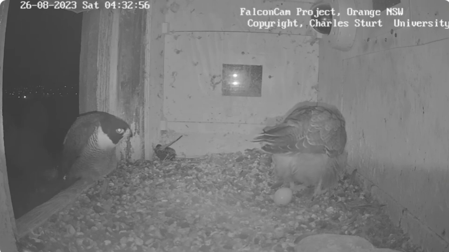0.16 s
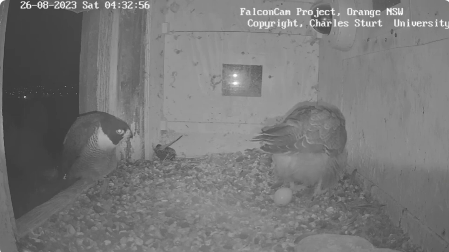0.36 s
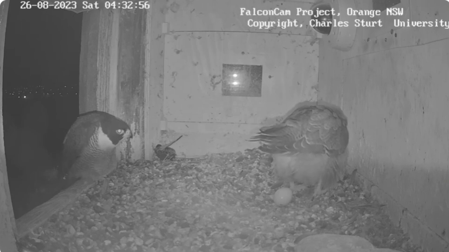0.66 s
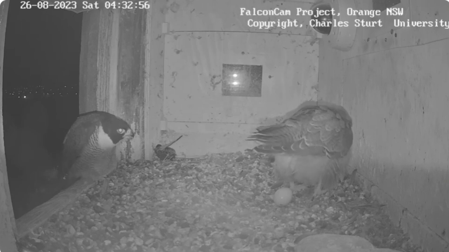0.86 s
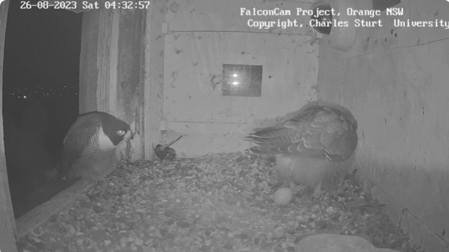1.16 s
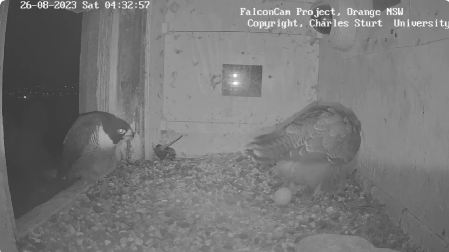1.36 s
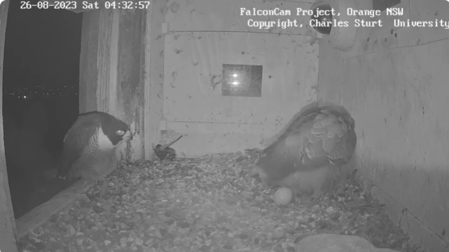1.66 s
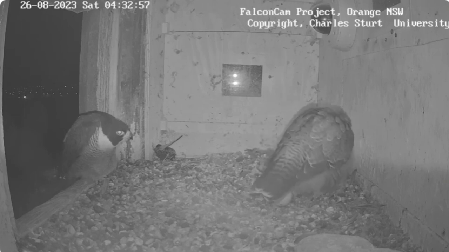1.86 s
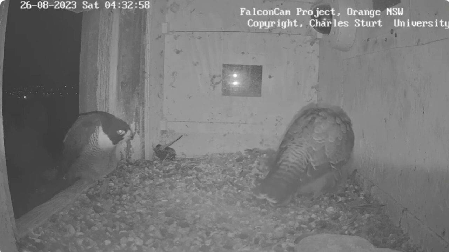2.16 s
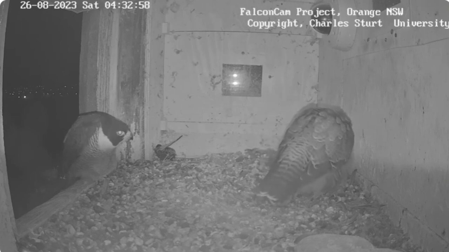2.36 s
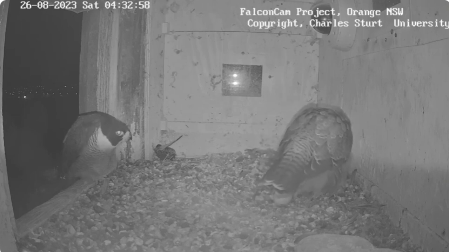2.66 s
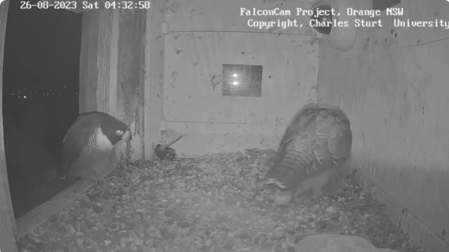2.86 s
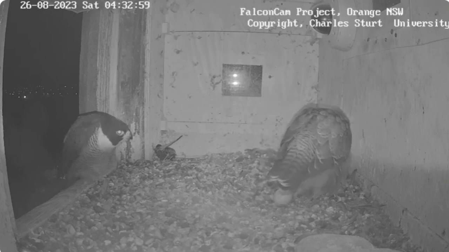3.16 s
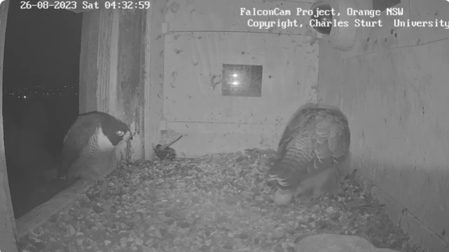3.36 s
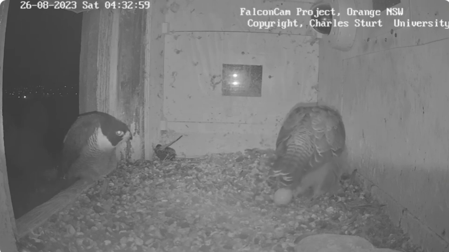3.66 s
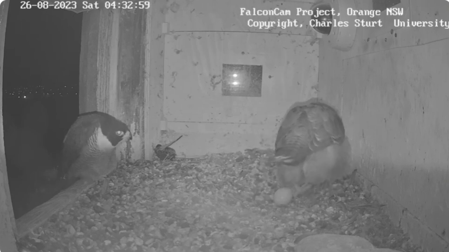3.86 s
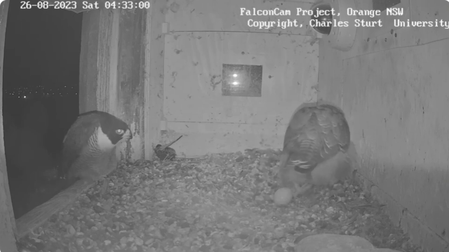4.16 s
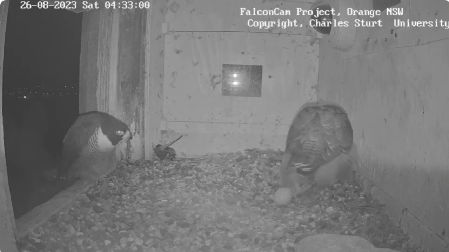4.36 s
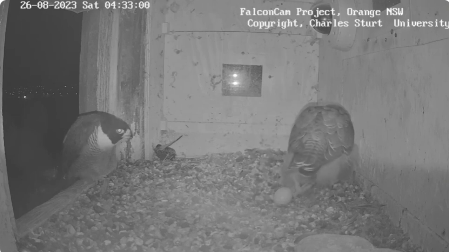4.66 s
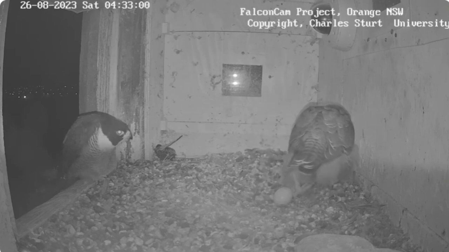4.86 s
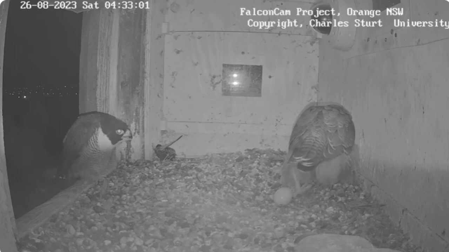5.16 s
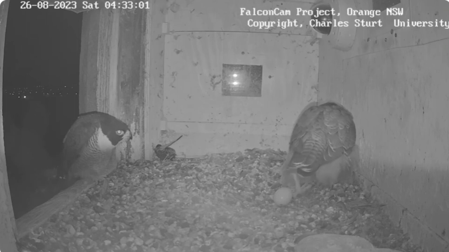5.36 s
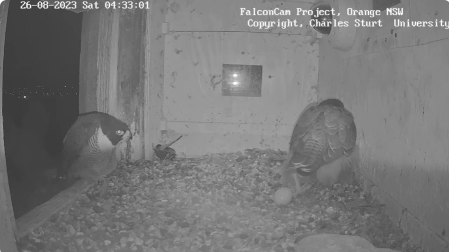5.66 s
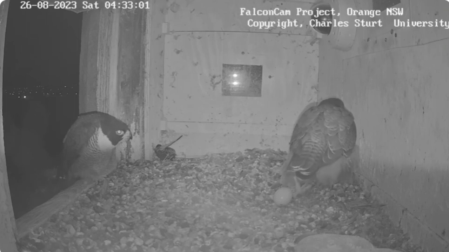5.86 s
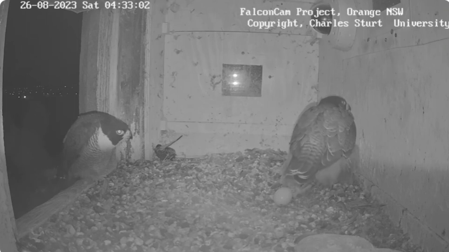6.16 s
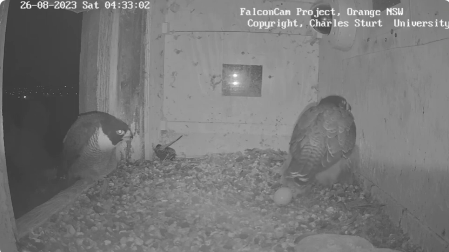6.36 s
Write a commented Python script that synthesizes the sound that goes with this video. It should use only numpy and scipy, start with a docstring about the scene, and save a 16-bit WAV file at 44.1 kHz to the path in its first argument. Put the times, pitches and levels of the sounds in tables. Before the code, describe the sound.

A falcon repeats a sharp, squeaky chirp with a croaky end, about seven times at uneven intervals, in a reverberant nest box. A soft, low hoot-like tone trails the opening call, and another falcon cuts in with one louder cry near the middle. Faint, dull steps on gravel lie beneath. The nest camera's microphone adds a constant electrical hum and hiss, with a very faint high tone late on.

```python
"""Sharp "ee-chup" calls of two falcons ring on in a long reverberant tail, over hum, hiss and rumble.
Each is a rising whistle that breaks down about an octave into a yelp and ends in a pulsed croak.
Midway one louder call answers, both sides of the syrinx sounding at once.
A grunt and a low hoot-like tone follow the first call; one bird shuffles on gravel.
A faint high tone enters late. The camera's sound cuts out twice for an instant."""
import sys
import numpy as np
from scipy import signal
from scipy.fft import rfft, irfft
from scipy.io import wavfile

SR = 44100
rng = np.random.default_rng(int(sys.argv[2]) if len(sys.argv) > 2 else 0)


def transcribe(u):
    """Save the signal u as a 16-bit wav file named by the first command-line argument.

    u: samples, shape (n,) or (channels, n), limited to [-1, 1]; the rate is SR.
    q: integer samples, one column per channel.
    """
    v = np.clip(np.atleast_2d(u).T, -1, 1)
    q = np.round(v * 32767).astype(np.int16)
    wavfile.write(sys.argv[1], SR, q)


N = 287532

# mains hum lines: freq_hz, level_db
HUM = [(50, -53), (100, -84.5), (200, -80), (300, -90), (500, -85.5)]
# microphone hiss spectrum: freq_hz, gain_db
HISS = [(60, -1.5), (250, -2), (500, -6), (1000, -13), (2000, -17), (4000, -19), (8000, -22.5),
        (15500, -27)]
# spectrum of rumble and steps: freq_hz, gain_db
RUMBLE = [(15, -21), (35, 5.5), (70, 2.5), (150, 0), (240, -7.5), (400, -15), (900, -58)]
# shuffles on gravel: start_s, length_s, level_db
STEPS = [(.10, 0.12, -62), (0.35, 0.17, -69), (2.76, 0.054, -62), (3.57, 0.21, -67.5), (3.89, 0.066, -61.5),
         (4.137, 0.13, -69), (4.846, 0.049, -68), (5.425, 0.054, -69)]
# swells of the low tone: start_s, length_s, level_db
HOOTS = [(.092, 0.072, -47.5), (0.249, 0.09, -51), (0.366, 0.26, -54), (0.686, 0.03, -52.5)]
# tail decay: freq_hz, t60_s
TAIL_DECAY = [(250, 3.26), (600, 2.8), (1100, 2.49), (2100, 1.75), (4400, 1.124), (6400, 0.91),
              (9000, 0.65), (14000, 0.45)]
# tail colour: freq_hz, gain_db
TAIL_COLOUR = [(200, 1.5), (350, 4), (500, 1.5), (700, -6.5), (950, -7), (1500, -8), (2100, 4),
               (3000, -2.5), (4400, 2.5), (6400, 0), (9000, -2.5), (14000, -12)]
# channel balance: freq_hz, left_minus_right_db
LEFT_LIFT = [(380, 0), (700, 3.2), (1290, 4.1), (1650, 2.2), (2000, .6), (3000, 0)]
# channel phase: freq_hz, left_lead_rad
LEFT_LEAD = [(100, 0), (330, 0.11), (600, 0.26), (1200, -0.22), (2300, -0.33), (3800, -0.089),
             (8000, 0.015)]
# camera dropouts: start_s, length_s
DROPOUTS = [(0.3003, .0022), (5.4553, .0022)]

# caller's throat resonances: centre_hz, width_hz, gain_db
THROAT = [(352, 344, -8), (710, 364, -3), (1113, 545, -1.5), (1525, 205, 3.5), (2360, 106, -0.5),
          (3027, 150, -4.5), (4500, 90, -8), (6100, 390, -30)]
# caller's chest resonances: centre_hz, width_hz, gain_db
CHEST = [(282, 140, -16), (580, 150, -7.5), (840, 200, -7.5)]
# closed-beak end of the first call: start_s, length_s, pitch_hz, level_db, beak_ratio, rough_share
GRUNT = (0.076, .045, 278, -54, 1.0, .35)
# whistle partials: pitch_ratio, gain_db
WHISTLE_TONES = [(.5, -16), (1, 3), (2, -7), (3, -24)]
# air through the open beak in a whistle: freq_hz, gain_db
WHISTLE_AIR = [(300, -11.5), (1300, 1), (1800, -24), (2350, 7.5), (2850, -9), (3500, -10), (5500, -16),
               (6000, -1), (6700, -4), (7600, -11), (10300, -22), (10800, -3), (11400, -18), (15000, -32)]
# yelp harmonics: pitch_ratio, gain_db
YELP_TONES = [(1, -0.5), (2, -3), (3, -4), (4, -16), (5, -26), (6, -37)]
# yelp lines at odd multiples of half the pitch: pitch_ratio, gain_db
UNDERTONES = [(.5, 5.5), (1.5, 1), (2.5, -5), (3.5, -15), (4.5, -23)]
# "ee-chup" calls: break_s, whistle_s, whistle_db, land_hz, fall_hz, yelp_db, under_rel_db,
# croak_delay_s, croak_s, croak_rel_db
CHUPS = [(-0.060, 0.037, -54, 1920, 693, -41.5, -18, 0.014, 0.016, -16),
         (0.744, .049, -53, 1915, 366, -39, -21, .015, 0.025, -5.5),
         (1.179, 0.033, -53, 2014, 343, -37.5, -12.5, .020, 0.021, -4.5),
         (2.002, .047, -51, 2011, 368, -37, -16, .017, 0.02, -4),
         (3.393, .049, -52.5, 1959, 259.6, -39.5, -8, 0.011, 0.0084, -12),
         (4.539, .044, -51.5, 2001, 245, -37.5, -3, .017, 0.011, -4.5),
         (6.355, 0.036, -55, 1929, 231, -41, -8, .013, 0.009, -9.5)]
# answering bird's throat resonances: centre_hz, width_hz, gain_db
ANSWER_THROAT = [(545, 142, -6.5), (955, 217, -0.5), (1268, 380, 0), (2260, 360, -9.5), (3430, 200, -4)]
# croak opening the answer: start_s, length_s, pitch_hz, level_db, beak_ratio, rough_share
ANSWER_CROAK = (2.833, .016, 440, -33.5, 1.0, .42)
# breath in the answer: freq_hz, gain_db
ANSWER_AIR = [(300, -19), (900, -22), (1500, 1), (2300, -3), (2900, 18), (3300, -4), (3900, -4), (4700, 0),
              (5450, -15), (5900, -38), (6900, -2.5), (7500, -7), (12000, -31)]
# notes of the answer: start_s, length_s, pitch_hz, level_db, swell_db, second_rel_db, lower_rel_db
ANSWER_NOTES = [(2.854, 0.037, 2702, -43.5, 16.5, 5.5, 2), (2.889, .026, 2705, -34.5, -1.5, -21, -28)]

LEAD_IN_SAMPLES = SR // 4  # the first call starts before time zero
TIME_S = np.arange(N) / SR


def amp(db):
    """Decibels to gain."""
    return 10 ** (np.asarray(db) / 20)


def unit_rms(x):
    """Scale to rms 1."""
    return x / np.sqrt(np.mean(x ** 2) + 1e-20)


def curve_at(points, hz):
    """Interpolate on a log-frequency axis."""
    points_hz, values = np.transpose(points)
    return np.interp(np.log(hz + 1), np.log(points_hz + 1), values)


def noise(size, spectrum):
    """Coloured noise, rms 1."""
    gain = amp(curve_at(spectrum, np.fft.rfftfreq(size, 1 / SR)))
    return unit_rms(irfft(rfft(rng.standard_normal(size)) * gain, size))


def waver(size, rate_hz):
    """Smooth random drift up to rate_hz, rms about 1."""
    hz = np.fft.rfftfreq(size + SR, 1 / SR)
    return unit_rms(irfft(rfft(rng.standard_normal(size + SR)) / (1 + (hz / rate_hz) ** 4)))[:size]


def phase_of(hz, jitter, rate_hz):
    """Running phase of an unsteady pitch."""
    return 2 * np.pi * np.cumsum(hz * (1 + jitter * waver(len(hz), rate_hz))) / SR


def stack(phase, tones):
    """Sum of partials locked to one phase."""
    return sum(amp(db) * np.sin(k * phase + rng.uniform(0, 2 * np.pi)) for k, db in tones)


def progress(length_s):
    """Ramp u, 0 to 1 over a syllable."""
    return np.linspace(0, 1, max(round(length_s * SR), 64))


def fade(u, rise, fall):
    """Soft edges; rise and fall are shares of the syllable."""
    return np.sin(np.pi / 2 * np.clip(u / rise, 0, 1)) * np.sin(np.pi / 2 * np.clip((1 - u) / fall, 0, 1))


def swell(start_s, length_s, rise_s, release_s):
    """Scene-long attack, hold, release envelope."""
    t = TIME_S - start_s
    return np.clip(t / rise_s, 0, 1) * np.exp(-np.maximum(t - length_s, 0) / release_s)


def narrow_tone(hz, tones, jitter, flutter_db):
    """Unsteady tone, rms 1; each partial flutters on its own."""
    phase = phase_of(np.full(N, hz), jitter, rate_hz=20.5)
    partials = (amp(db + flutter_db * waver(N, rate_hz=82)) * np.sin(k * phase) for k, db in tones)
    return unit_rms(sum(partials))


def mains_hum():
    """Steady 50 Hz and harmonics."""
    return sum(np.sqrt(2) * amp(db) * np.sin(2 * np.pi * hz * TIME_S) for hz, db in HUM)


def microphone_hiss(level_db=-68):
    """Steady noise, weaker toward the treble."""
    return amp(level_db) * noise(N, HISS)


def rumble_and_steps(rumble_db=-69.5, waver_db=1.8):
    """Low rumble that swells with each step on the gravel."""
    steady = amp(rumble_db + waver_db * waver(N, rate_hz=5))
    steps = sum(amp(db) * swell(start_s, length_s, rise_s=.014, release_s=.04)
                for start_s, length_s, db in STEPS)
    return np.hypot(steady, steps) * noise(N, RUMBLE)


def thin_tone(start_s=3.93, rise_s=.4, level_db=-80, fade_db_per_s=3, waver_db=2.2):
    """Faint high tone: creeps in, wavers, fades."""
    t = TIME_S - start_s
    level = np.clip(t / rise_s, 0, 1) * amp(level_db - fade_db_per_s * t + waver_db * waver(N, rate_hz=4))
    return level * narrow_tone(hz=2840.3, tones=[(1, 0)], jitter=.00207, flutter_db=.5)


def hoot(rise_s=.032, release_s=.025, ring_db=-15, ring_t60_s=7.2):
    """Low tone; each swell leaves a weak, slow ring."""
    power = np.zeros(N)
    for start_s, length_s, db in HOOTS:
        body = swell(start_s, length_s, rise_s, release_s)
        ring = amp(ring_db) * swell(start_s, length_s, rise_s, ring_t60_s / np.log(1000))
        power += amp(db) ** 2 * (body ** 2 + ring ** 2)
    return np.sqrt(power) * narrow_tone(hz=283.3, tones=[(1, 7), (2, -32)], jitter=.018, flutter_db=3.5)


def long_reverb(x, walls_db=-8, walls_per_s=900, walls_decay_s=.028, tail_db=.5, build_s=.0034):
    """Quick reflections off near walls, then a long tail whose treble dies first."""
    size = 3 * SR
    t = np.arange(size) / SR
    walls = rng.standard_normal(size) * (rng.random(size) < walls_per_s / SR)
    walls *= np.exp(-t / walls_decay_s) * (t > .002)
    hz, frame_s, bins = signal.stft(rng.standard_normal(size), SR, nperseg=512)
    bins *= amp(curve_at(TAIL_COLOUR, hz)[:, None] - 60 * frame_s / curve_at(TAIL_DECAY, hz)[:, None])
    tail = signal.istft(bins, SR, nperseg=512)[1][:size]
    tail *= (1 - np.exp(-t / build_s)) / np.sqrt(SR / 10)
    response = amp(walls_db) * walls / np.linalg.norm(walls) + amp(tail_db) * tail
    return signal.fftconvolve(x, response)[:len(x)]


def two_channels(x):
    """Left slightly stronger near 1 kHz, with small phase shifts either side."""
    hz = np.fft.rfftfreq(len(x), 1 / SR)
    left = amp(curve_at(LEFT_LIFT, hz) / 2) * np.exp(.5j * curve_at(LEFT_LEAD, hz))
    return irfft(rfft(x) * np.array([left, 1 / left]), len(x))


def croak(start_s, length_s, pitch_hz, level_db, beak_ratio, rough_share,
          resonances=THROAT, cutoff_hz=7000, rise=.22):
    """Uneven pulses and air puffs ring the resonances; beak opening scales their frequencies."""
    u = progress(length_s)
    cycles = phase_of(pitch_hz * (1 + .25 * (.5 - u)), jitter=.078, rate_hz=360) / (2 * np.pi)
    pulses = np.diff(np.floor(cycles), prepend=-1)
    puffs = np.exp(-(cycles % 1) / .33) * rng.standard_normal(len(u))
    drive = (1 - rough_share) * unit_rms(pulses) + rough_share * unit_rms(puffs)
    drive = np.pad(drive * fade(u, rise, fall=.045), (0, 256))
    voice = np.zeros(len(drive))
    for k, (centre_hz, width_hz, gain_db) in enumerate(resonances):
        hz = centre_hz * beak_ratio
        voice += (-1) ** k * amp(gain_db) * signal.lfilter(*signal.iirpeak(hz, hz / width_hz, SR), drive)
    voice = signal.sosfilt(signal.butter(3, cutoff_hz, fs=SR, output="sos"), voice)
    return start_s, amp(level_db) * voice / np.sqrt(np.mean(voice[:len(u)] ** 2))


def grunt(lead_s=.013, open_s=.026, open_rel_db=4):
    """Longer croak: starts with the beak open, goes on in the chest."""
    start_s, _, pitch_hz, db = GRUNT[:4]
    return [croak(start_s - lead_s, open_s, pitch_hz, db + open_rel_db, beak_ratio=1.146, rough_share=.72),
            croak(*GRUNT, resonances=CHEST, cutoff_hz=4400)]


def whistle(start_s, length_s, top_hz, start_db, swell_db_per_s=165, air_db=-14, beak_db=-9):
    """Breathy tone climbs and swells as pressure builds; overtones enter as the beak opens."""
    u = progress(length_s)
    hz = top_hz * (1 - .12 * (1 - u / .891) ** 2)
    tones = [(k, db + beak_db * (k > 1) * (1 - u) ** 2) for k, db in WHISTLE_TONES]
    tone = unit_rms(stack(phase_of(hz, jitter=.016, rate_hz=420), tones))
    tone *= amp(2.26 * waver(len(u), rate_hz=570))
    air = amp(air_db) * noise(len(u), WHISTLE_AIR)
    level = amp(start_db + swell_db_per_s * length_s * u)
    return start_s, (tone + air) * level * fade(u, rise=.11, fall=.12)


def yelp(start_s, land_hz, fall_hz, level_db, under_rel_db,
         length_s=.0236, tilt_db_per_oct=.44, rasp_db=-13, settle_db=7):
    """The syrinx slides down; alternate cycles differ unevenly, adding rough half-pitch lines."""
    u = progress(length_s)
    phase = phase_of(land_hz + fall_hz * (1 - u) ** 1.156, jitter=.022, rate_hz=440)
    main, under = (stack(phase, [(k, db + tilt_db_per_oct * np.log2(k)) for k, db in tones])
                   for tones in (YELP_TONES, UNDERTONES))
    under *= amp(under_rel_db - settle_db * (u - .5)) * (1.01 + .38 * waver(len(u), rate_hz=180))
    rasp = 1 + amp(rasp_db) * waver(len(u), rate_hz=620)
    return start_s, amp(level_db) * unit_rms(main + under) * rasp * fade(u, rise=.27, fall=.1)


def chup(break_s, whistle_s, whistle_db, land_hz, fall_hz, yelp_db, under_rel_db,
         croak_delay_s, croak_s, croak_rel_db, overlap_s=.0048):
    """One call: whistle breaks into yelp, croak closes it."""
    return [whistle(break_s - whistle_s, whistle_s + overlap_s, top_hz=2.24 * land_hz, start_db=whistle_db),
            yelp(break_s, land_hz, fall_hz, yelp_db, under_rel_db),
            croak(break_s + croak_delay_s, croak_s, pitch_hz=338.6, level_db=yelp_db + croak_rel_db,
                  beak_ratio=1.033, rough_share=.38)]


def answer_note(start_s, length_s, pitch_hz, level_db, swell_db, second_rel_db, lower_rel_db,
                low_hz=1225, low_fade_db=12, air_db=-8, break_s=2.892, dip_hz=340, dip_s=.00509):
    """Both sides of the syrinx sound and modulate each other, adding sum and difference tones."""
    u = progress(length_s)
    dip = np.exp(-((start_s + length_s * u - break_s) / dip_s) ** 2)  # one note breaks into the next
    high = phase_of(pitch_hz - dip_hz * dip, jitter=.011, rate_hz=380)
    low = phase_of(np.full(len(u), low_hz), jitter=.025, rate_hz=150)
    first_db = level_db + swell_db * (u - .5)
    second_db = level_db + second_rel_db + .3 * swell_db * (u - .5)
    lower_db = level_db + lower_rel_db
    partials = [(high, first_db), (2 * high, second_db),
                (3 * high, first_db - 25), (4 * high, second_db - 28),
                (low, lower_db - low_fade_db * (u - .5)),
                (2 * high - low, lower_db - 2), (2 * high + low, lower_db - 13)]
    cry = np.sqrt(2) * sum(amp(db) * np.sin(phase) for phase, db in partials)
    air = amp(np.maximum(first_db, second_db) + air_db) * noise(len(u), ANSWER_AIR)
    rasp = 1 + .31 * waver(len(u), rate_hz=210)
    return start_s, (cry * rasp + air) * fade(u, rise=.27, fall=.11)


def scene(direct_db=-1.8):
    """All calls share one reverb, over the background."""
    syllables = [part for row in CHUPS for part in chup(*row)] + grunt()
    syllables.append(croak(*ANSWER_CROAK, resonances=ANSWER_THROAT, cutoff_hz=4400, rise=.34))
    syllables += [answer_note(*row) for row in ANSWER_NOTES]
    birds = np.zeros(LEAD_IN_SAMPLES + N)
    for start_s, sound in syllables:
        slot = birds[LEAD_IN_SAMPLES + round(start_s * SR):][:len(sound)]
        slot += sound[:len(slot)]
    calls = (amp(direct_db) * birds + long_reverb(birds))[LEAD_IN_SAMPLES:]
    background = mains_hum() + microphone_hiss() + rumble_and_steps() + hoot() + thin_tone()
    return two_channels(background + calls)


def record(dry, cutoff_hz=15700):
    """Camera: two tiny dropouts click in the hum, then the band limit."""
    silent = np.any([(TIME_S > s) & (TIME_S < s + length_s) for s, length_s in DROPOUTS], axis=0)
    lowpass = signal.firwin(511, cutoff_hz, window=("kaiser", 9), fs=SR)
    return signal.oaconvolve(dry * ~silent, lowpass[None], "same")


dry = scene()
out = record(dry)
transcribe(out)
```